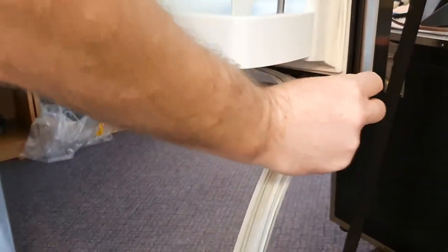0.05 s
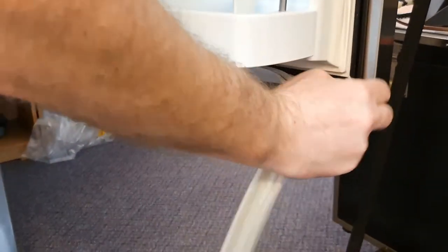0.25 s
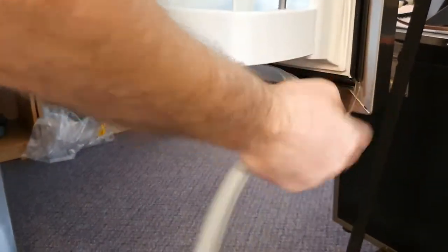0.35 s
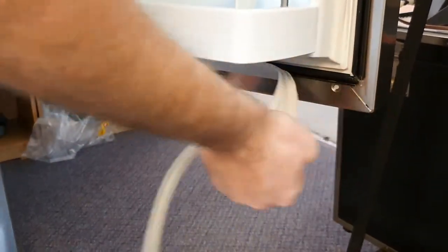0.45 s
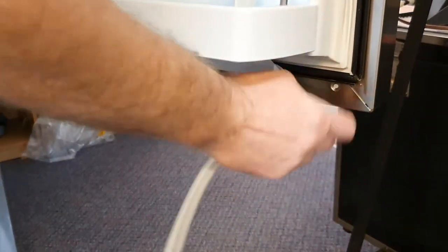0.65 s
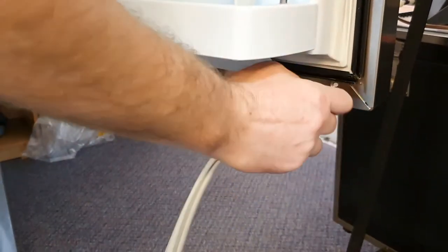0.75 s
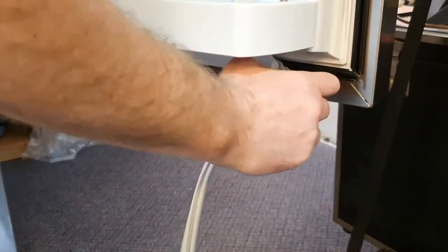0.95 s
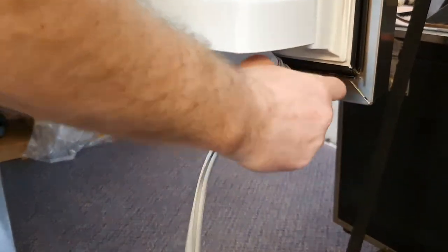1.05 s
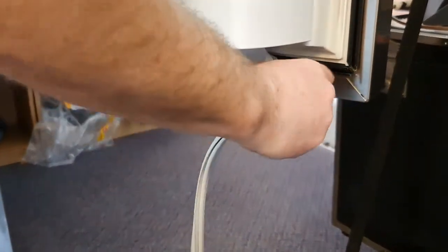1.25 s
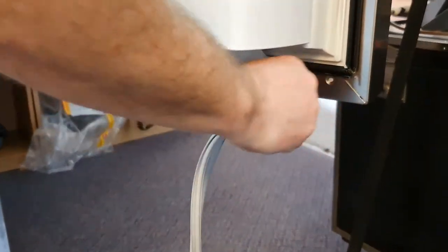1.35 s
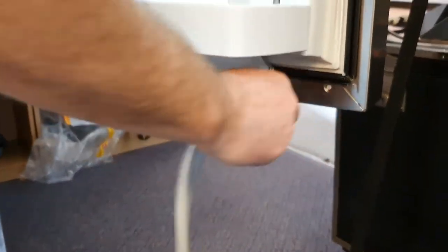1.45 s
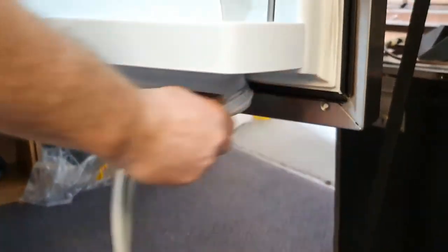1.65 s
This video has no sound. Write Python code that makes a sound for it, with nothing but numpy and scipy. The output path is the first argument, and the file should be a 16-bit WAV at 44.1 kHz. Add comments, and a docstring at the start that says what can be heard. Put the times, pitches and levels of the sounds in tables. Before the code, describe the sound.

Close up in a quiet room, a rubber seal is pulled from a fridge door with a low shudder and a loud snap. Another pull brings a dull knock and soft rubbing with tiny squeaks, over a faint compressor hum.

```python
"""A fridge compressor hums in a quiet room; close by, a soft rubber gasket is tugged twice from its groove.
Each tug knocks and shakes the door and drags rubber over plastic in a rasp of tiny stick-slip releases.
The first ends in sharp snaps as the lip lets go, rattling the liner and ringing the door panel.
The second trails off in small squeaks, and the loose strip slides through the hand at the end."""
import sys
import numpy as np
from scipy import signal
from scipy.fft import rfft, irfft
from scipy.io import wavfile
from scipy.ndimage import uniform_filter1d

SR = 44100
rng = np.random.default_rng(int(sys.argv[2]) if len(sys.argv) > 2 else 0)


def file_out(sig):
    """Save sig as 16-bit WAV at sys.argv[1]."""
    # one column per channel
    cols = np.atleast_2d(sig).T
    # limit, then scale
    lim = np.clip(cols, -1, 1)
    pcm = np.round(lim * 32767).astype(np.int16)
    wavfile.write(sys.argv[1], SR, pcm)


N = 74970
TIME, HZ = np.arange(N) / SR, np.fft.rfftfreq(N, 1 / SR)

# tone curves of the noise layers (frequency [Hz], relative level [dB])
AIR_EQ = [(20, -26), (45, 2.5), (90, 4), (170, -4.5), (280, -6), (450, -16.5), (750, -20), (1400, -28),
          (2300, -40.5), (4500, -43.5), (6500, -50), (10000, -49.5), (15500, -51.5), (16500, -64.5)]  # room tone
SLIDE_EQ = [(500, 1.5), (1200, 1.5), (1750, 4.5), (2400, -1), (3800, -2), (6500, -12.5), (8600, -3),
            (10000, -7.5), (11200, -1.5), (12200, -14), (14000, -9.5), (16000, -11.5)]  # strip on hand and door
DOOR_BASS_EQ = [(20, -43), (29, -28.5), (41, -2), (58, -8), (74, 1.5), (105, -2.5), (145, -11.5),
                (200, -22.5), (400, -81)]  # low end of the shudder
DOOR_BODY_EQ = [(90, -27.5), (160, 2), (255, 0.5), (320, -8), (425, -6.5), (520, -14.5), (640, -10.5),
                (850, -26.5), (1800, -61)]  # its low mids
RUB_EQ = [(350, -6.5), (700, -1), (1300, 1.5), (1900, -1.5), (2400, -6.5), (3300, -13.5), (4500, -22.5),
          (8000, -56.5)]  # rubber on plastic
HISS_EQ = [(1800, -15), (3300, 9), (4300, -2), (5500, -8), (8000, -8.5), (11500, -31.5), (16000, -29.5)]  # top end of the drag
CRACK_EQ = [(300, -11), (600, -9.5), (1000, 0.5), (1500, -2), (2050, -3), (3000, -3), (3600, 0),
            (5100, 3.5), (5900, -6.5), (9000, -13.5), (11300, -0.5), (12600, -8.5), (14200, -3.5),
            (17000, -14.5)]  # lip letting go
RATTLE_EQ = [(400, -22.5), (620, -20.5), (800, -1), (1080, 0.5), (1350, 0.5), (1750, -1.5), (2300, -4),
             (3000, -10.5), (4300, -10), (5200, -19.5), (11000, -21.5), (16000, -31.5)]  # liner and shelves
REVERB_EQ = [(300, -20.5), (1000, 6.5), (2000, -2.5), (4500, -8.5), (7000, -15.5), (11000, -17.5),
             (16000, -26)]  # room tail
# likeness of the two ears (frequency [Hz], correlation [0-1])
AIR_LIKENESS = [(60, 1), (200, 1), (640, 0.8), (1400, 0.06), (3100, .05)]
FRICTION_LIKENESS = [(60, 0.96), (140, 1), (300, .85), (640, 0.8), (1400, 0.4), (3100, 0.01),
                     (15000, 0.049)]
SNAP_LIKENESS = [(600, .92), (1200, 0.6), (2300, .25), (5000, 0.7), (9000, 0)]
# swells of the compressor's drone (time [s], low tone [dB], high tone [dB])
DRONE_SWELLS = [(0, -51.5, -77), (0.079, -49.5, -113), (0.158, -57.5, -100), (.45, -46.5, -57),
                (.56, -51.5, -56.5), (0.659, -41, -55), (.76, -51, -54.5), (0.901, -43.5, -49),
                (1.001, -49, -53), (1.1, -58, -54), (1.2, -45.5, -52.5), (1.54, -45.5, -53),
                (1.64, -57.5, -57), (1.7, -49.5, -63)]
# the compressor's upper tones (frequency [Hz], level [dB], waver [dB])
HUM_TONES = [(338, -65, 2.5), (582, -77, 2), (684, -75, -5)]
# swishes of the loose strip (centre [s], half length [s], level [dB], tilt [dB/octave])
STRIP_SLIDES = [(0.105, 0.091, -69, -3), (0.658, 0.018, -69, -2.5), (0.838, 0.011, -65, -4.5),
                (1, 0.03, -64, -9.5), (1.271, 0.0053, -65.5, 0), (1.296, 0.045, -53, -5.5),
                (1.564, 0.024, -62.5, -14), (1.641, 0.076, -63, -2.5), (1.7, 0.07, -64, -4.5)]
# the door's shudder, one envelope per tug (time [s], bass [dB], low mids [dB])
DOOR_SHAKES = [
    [(0.222, -58, -49), (0.234, -47, -39.5), (0.256, -26, -34), (0.276, -38, -35), (0.318, -28.5, -40.5),
     (0.348, -34.5, -45), (0.378, -32, -39), (0.414, -39.5, -47), (0.426, -59, -49), (0.435, -39.5, -47)],
    [(1.165, -49, -63.5), (1.189, -47.5, -45), (1.207, -31.5, -34), (1.217, -42, -37.5),
     (1.255, -25.5, -34.5), (1.283, -36, -42), (1.4, -41, -52)],
]
# door knocks as a tug takes up the slack (time [s], frequency [Hz], level [dB], t60 [s])
DOOR_KNOCKS = [(0.229, 175.4, -33, 0.15), (1.193, 238.6, -29, 0.065), (1.222, 70.2, -27.5, 0.36)]
# rubber leaving the groove (start [s], rise [s], hold [s], fade [dB/s], rub [dB], hiss [dB])
GASKET_DRAGS = [(0.216, 0.039, 0.023, 107.5, -51, -64), (1.194, 0.031, 0.021, 134, -46.5, -62.5)]
# rubber catching on plastic (centre [s], half length [s], level [dB], frequency [Hz], width [Hz])
RUBBER_SQUEAKS = [(1.195, 0.0043, -49.5, 1160, 400), (1.231, 0.0083, -46.5, 680, 220),
                  (1.268, 0.0077, -59.5, 4270, 1500), (1.308, 0.017, -56.5, 2760, 1120),
                  (1.509, 0.0075, -64, 1780, 170), (1.58, 0.037, -68, 1710, 130),
                  (1.69, 0.022, -61, 1440, 41.3)]
# modes of the door panel (frequency [Hz], relative level [dB], t60 [s])
PANEL_MODES = [(809, -39, .13), (892, -43, .2), (1028, -33, .13), (1107, -35, .15), (1175, -38.5, .15),
               (1276, -43, .12), (1443, -43, .07), (1594, -38, .08), (1760, -42, .1), (1899, -39, .09),
               (2230, -42, .07), (2824, -43, .07)]
# the lip snapping free (time [s], gain [dB], tilt [dB/octave], pan [dB], rattle trim [dB],
# panel trim [dB], reverb trim [dB], rings of the freed lip (frequency [Hz], relative level [dB], t60 [s]))
LIP_SNAPS = [ (0.345, -23.5, -1, -6.5, 4, -10, 10.5, [(1500, -13.5, .009), (2730, -6.5, 0.0062),
             (4110, -10, .008), (7500, -7.5, .004), (11140, -10.5, .004)]),
             (0.3478, -25, 0, -0.5, 6, -13, -7, [(1520, -14.5, 0.03), (2480, -14.5, 0.025)]),
             (0.3862, -3, 0.5, -1, -5, 0, -5, [(1040, -16, 0.024), (2000, -17.5, .009), (3510, -19, 0.0043),
             (4895, -10.5, .005)]), (0.4668, -26.5, -2.5, -0.5, -42, -30, -10, [(450, -10, .008),
             (1585, -9.5, .009), (5140, -11, .004)]),
             (0.965, -51, -3.5, -3, -26, -17, -13, [(3800, -12, .006)]), ]

DRONE_HZ, MIDDLE_TONE_DB = (72.14, 158.7, 221.1), -6  # the middle tone rides under the high one
AIR_DB, EAR_LAG_TURNS = -52, 0.15
RUB_PAN_DB, HISS_PAN_DB, SLIDE_PAN_DB, AIR_PAN_DB = -5, -3, -4, -1
SLIPS_PER_S, RASP_SLIPS_PER_S, SLIP_SPREAD_DB, HISS_LAG_S = 4600, 1700, -1, .018
SHAKE_ATTACK_S, SHAKE_RELEASE_S, KNOCK_RISE_S = .005, .04, .0025
CRACK_DB, RATTLE_DB, PANEL_DB, REVERB_DB = 1.5, 7, 3.5, -9.5  # balance within a snap
CRACK_DECAY_S, EAR_DELAY_S, SNAP_RISE_S, REVERB_T60_S = .0014, .000045, .0006, .42
RATTLE_TAPS_PER_S, RATTLE_CHOKE_S = 2500, .012
RATTLE_FADE_DB_PER_S, RATTLE_CHOKE_DB_PER_S = 281, 898.5
HIGH_CUT_HZ = 16200


def amp(db):
    """Decibels to gain."""
    return 10 ** (np.asarray(db) / 20)


def unit_rms(x):
    """Scales to an rms of one."""
    return x / np.sqrt(np.mean(x ** 2) + 1e-20)


def curve(points):
    """Spreads a table over the spectrum on a log-frequency axis."""
    hz, value = np.transpose(points)
    return np.interp(np.log(HZ + 1), np.log(hz), value)


def pan(db):
    """Stereo gains for a level difference; negative leans right."""
    return amp([[db / 2], [-db / 2]])


def add(mix, start_s, sound):
    """Mixes a stereo sound in at a time."""
    part = mix[:, max(round(start_s * SR), 0):]
    part += sound[:, :part.shape[1]]


def bell(centre_s, half_s):
    """A smooth fade in and out."""
    return np.exp(-((TIME - centre_s) / half_s) ** 2 / 2)


def colour(x, eq, tilt_db=0):
    """Minimum-phase EQ of unit energy, tilted per octave above 500 Hz."""
    db = curve(eq) + tilt_db * np.log2(np.maximum(HZ, 500) / 3000)
    log_gain = np.log(unit_rms(amp(db)))
    phase = -signal.hilbert(np.r_[log_gain, log_gain[-2:0:-1]]).imag[:len(HZ)]
    return irfft(rfft(x) * np.exp(log_gain + 1j * phase), N)


def narrow(pair, likeness):
    """Narrows the stereo image of two unrelated signals, band by band."""
    left, right = rfft(pair)
    same = np.clip(curve(likeness), 0, 1)
    return irfft(np.array([left, same * left + np.sqrt(1 - same ** 2) * right]), N)


def steadied(x, span_s):
    """Evens out chance swells longer than the span."""
    power = uniform_filter1d((x ** 2).mean(0), max(int(span_s * SR), 2))
    return x / np.sqrt(abs(power) + 1e-9)


def wander(hz):
    """Slow random drift of rms one."""
    return unit_rms(irfft(rfft(rng.standard_normal(N)) * np.exp(-(HZ / hz) ** 2), N))


def burst(envelope):
    """Stereo noise of unit energy under an envelope."""
    noise = rng.standard_normal((2, N)) * envelope
    return noise / np.linalg.norm(noise, axis=1, keepdims=True)


def slips(per_s=SLIPS_PER_S):
    """A dense train of tiny stick-slip releases of uneven size."""
    size = amp(SLIP_SPREAD_DB * np.minimum(rng.exponential(1, (2, N)), 5))
    return rng.standard_normal((2, N)) * size * (rng.random((2, N)) < per_s / SR)


def friction(eq, tilt_db=0, per_s=SLIPS_PER_S):
    """Stick-slip grain of rms one, near mono in the bass and wide on top."""
    return unit_rms(colour(narrow(slips(per_s), FRICTION_LIKENESS), eq, tilt_db))


def tone(hz, drift_hz=0.97):
    """A slightly unsteady hum tone of rms one, a little later at the left ear."""
    turns = np.cumsum(hz + drift_hz * wander(4.4)) / SR + rng.random()
    return np.sqrt(2) * np.sin(2 * np.pi * np.array([turns - EAR_LAG_TURNS, turns]))


def room_air():
    """A steady bed of dark room tone."""
    noise = narrow(rng.standard_normal((2, N)), AIR_LIKENESS)
    return amp(AIR_DB) * pan(AIR_PAN_DB) * unit_rms(colour(noise, AIR_EQ))


def compressor():
    """The compressor drones on three swelling tones, with a faint wavering hum above."""
    times, low_db, high_db = np.transpose(DRONE_SWELLS)
    swells = (low_db, high_db + MIDDLE_TONE_DB, high_db)
    drone = sum(amp(np.interp(TIME, times, db)) * tone(hz) for hz, db in zip(DRONE_HZ, swells))
    hum = sum(amp(db + waver_db * wander(1.5)) * tone(hz) for hz, db, waver_db in HUM_TONES)
    return drone + hum


def strip_slides():
    """The loose strip swishes faintly against hand and door."""
    swishes = sum(amp(db) * bell(centre, half) * friction(SLIDE_EQ, tilt_db)
                  for centre, half, db, tilt_db in STRIP_SLIDES)
    return pan(SLIDE_PAN_DB) * swishes


def door_shudder():
    """The door shakes low while the gasket is under tension."""
    out = np.zeros((2, N))
    for shake in DOOR_SHAKES:
        times, bass_db, body_db = np.transpose(shake)
        attack, release = (TIME - times[0]) / SHAKE_ATTACK_S, (times[-1] - TIME) / SHAKE_RELEASE_S
        gate = np.clip(np.minimum(attack, release) + 1, 0, 1) ** 2
        for db, eq, span_s in ((bass_db, DOOR_BASS_EQ, .03), (body_db, DOOR_BODY_EQ, .015)):
            out += gate * amp(np.interp(TIME, times, db)) * steadied(friction(eq), span_s)
    return out


def door_knocks():
    """The door rings dully as the gasket first bites."""
    out = np.zeros((2, N))
    for start, hz, db, t60 in DOOR_KNOCKS:
        envelope = np.minimum(TIME / KNOCK_RISE_S, 1) * amp(db - 60 * TIME / t60)
        add(out, start, envelope * np.sin(2 * np.pi * hz * TIME)[None])
    return out


def rubber_squeaks():
    """Rubber catches on plastic, its slips exciting one resonance for a moment."""
    out = np.zeros((2, N))
    for centre, half, db, hz, width in RUBBER_SQUEAKS:
        resonance = 1 / (1 + 2j * (HZ - hz) / width) ** 2
        squeak = unit_rms(irfft(rfft(slips()) * resonance, N))
        out += amp(db) * bell(centre, half) * squeak
    return pan(HISS_PAN_DB) * out


def gasket_drags():
    """Rubber rasps along the groove; the hiss follows as it gathers speed."""
    out = np.zeros((2, N))
    for start, rise, hold, fade, rub_db, hiss_db in GASKET_DRAGS:
        layers = (0, rub_db, RUB_EQ, RUB_PAN_DB), (HISS_LAG_S, hiss_db, HISS_EQ, HISS_PAN_DB)
        for lag, db, eq, pan_db in layers:
            age = TIME - start - lag
            envelope = np.clip(age / rise, 0, 1) * amp(db - fade * np.maximum(age - rise - hold, 0))
            out += pan(pan_db) * envelope * friction(eq, per_s=RASP_SLIPS_PER_S)
    return out


def room_tail(attack, tilt_db):
    """The room answers a snap with a dying wash of noise."""
    return colour(burst(attack ** 2 * amp(-60 * TIME / REVERB_T60_S)), REVERB_EQ, tilt_db)


def panel_ring(attack):
    """The door panel's modes ring on, slightly out of phase between the ears."""
    out = np.zeros((2, N))
    for hz, db, t60 in PANEL_MODES:
        turns = hz * TIME + rng.random() + 0.18 * rng.random((2, 1))
        out += amp(db - 60 * TIME / t60) * np.sin(2 * np.pi * turns)
    return attack * out


def liner_rattle(attack, tilt_db):
    """The liner and shelves chatter in a flurry of taps that fades, then chokes off."""
    taps = rng.random(N) < RATTLE_TAPS_PER_S / SR
    choke_db = RATTLE_CHOKE_DB_PER_S * np.maximum(TIME - RATTLE_CHOKE_S, 0)
    envelope = attack * amp(-RATTLE_FADE_DB_PER_S * TIME - choke_db)
    return colour(narrow(burst(envelope * taps), SNAP_LIKENESS), RATTLE_EQ, tilt_db)


def lip_crack(tilt_db, rings):
    """The lip's sharp release and its brief rings, reaching the right ear first."""
    spectrum = rfft(narrow(burst(np.exp(-TIME / CRACK_DECAY_S)), SNAP_LIKENESS))
    spectrum /= np.sqrt(uniform_filter1d(abs(spectrum) ** 2, size=1500, axis=1))  # flatten before the EQ
    ring = sum((-1) ** k * amp(db - 60 * TIME / t60) * np.sin(2 * np.pi * hz * TIME)
               for k, (hz, db, t60) in enumerate(rings))
    left, right = amp(CRACK_DB) * colour(irfft(spectrum, N), CRACK_EQ, tilt_db) + ring
    return np.array([np.interp(TIME - EAR_DELAY_S, TIME, left, 0), right])


def lip_snaps():
    """The lip lets go with a crack that sets off the liner, the panel and the room."""
    out = np.zeros((2, N))
    attack = np.minimum(TIME / SNAP_RISE_S, 1)
    for start, db, tilt_db, pan_db, rattle_db, panel_db, reverb_db, rings in LIP_SNAPS:
        rattle = amp(RATTLE_DB + rattle_db) * liner_rattle(attack, tilt_db)
        panel = amp(PANEL_DB + panel_db) * panel_ring(attack)
        tail = amp(REVERB_DB + reverb_db) * room_tail(attack, tilt_db)
        snap = lip_crack(tilt_db, rings) + rattle + panel + tail
        add(out, start, amp(db) * pan(pan_db) * snap)
    return out


def scene():
    """The two tugs over a bed of hum and room tone."""
    tugs = door_shudder() + door_knocks() + gasket_drags() + lip_snaps() + rubber_squeaks()
    return tugs + strip_slides() + compressor() + room_air()


def record(dry):
    """A steep high cut on the whole mix."""
    high_cut = signal.firwin(401, HIGH_CUT_HZ, window=("kaiser", 9), fs=SR)
    return signal.oaconvolve(dry, high_cut[None], "same")


dry = scene()
out = record(dry)
file_out(out)
```